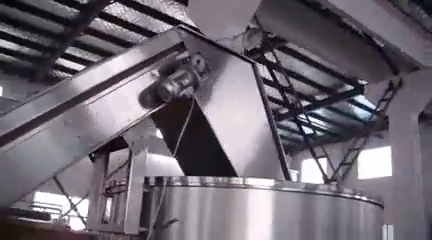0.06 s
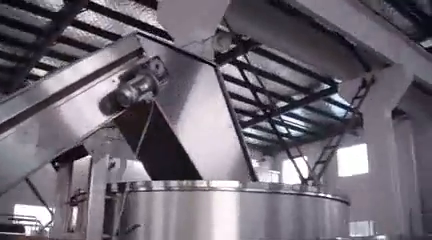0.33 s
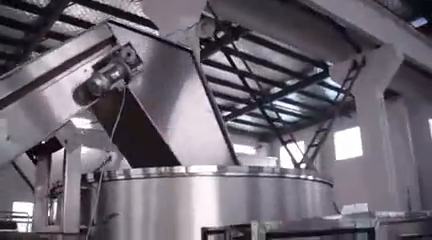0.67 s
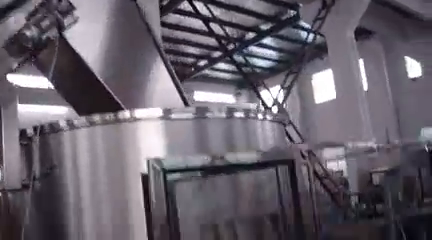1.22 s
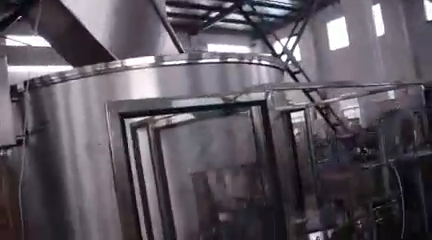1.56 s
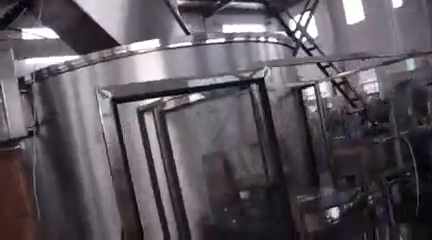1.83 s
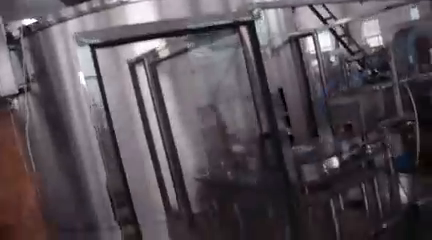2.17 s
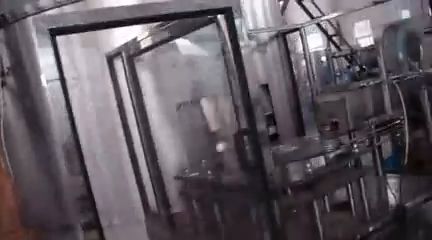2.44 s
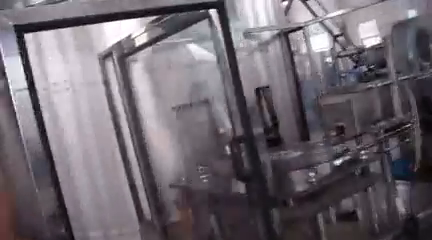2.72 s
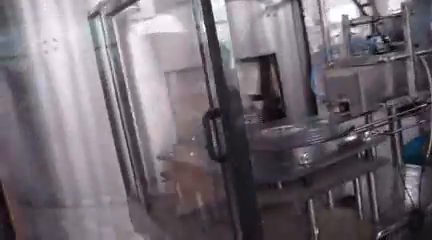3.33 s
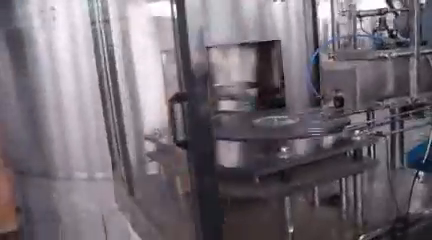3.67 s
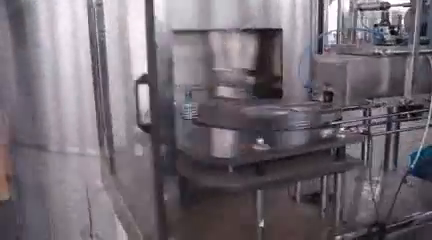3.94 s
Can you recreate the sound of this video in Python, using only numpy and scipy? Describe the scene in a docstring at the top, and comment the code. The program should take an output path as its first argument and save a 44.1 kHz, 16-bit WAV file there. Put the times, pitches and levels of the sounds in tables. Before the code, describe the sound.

A bottle sorting machine hisses, rumbles and puffs air rhythmically in a factory hall.

```python
"""Factory hall, stereo microphone carried along the steel drum of a bottle sorter, a little to one side.
From the start air jets hiss, the drive hums and the drum rumbles and knocks with tumbling plastic bottles.
From 0.3 s a bottle passes a jet about three times a second: a short puff, bright, then hollow.
Near 1.5 s one puff is missing and the hum swells as the microphone passes the drum.
After 2.6 s the gear whine fades and the rumble sinks, while the hiss and the puffs carry on."""
import sys
import numpy as np
from scipy import signal
from scipy.fft import rfft, irfft, next_fast_len
from scipy.io import wavfile
from scipy.ndimage import uniform_filter1d, map_coordinates

SR = 44100
rng = np.random.default_rng(int(sys.argv[2]) if len(sys.argv) > 2 else 0)


def transcribe(signal):
    """Save signal, clipped to [-1, 1], as a 16-bit WAV file at the path in sys.argv[1]."""
    frames = np.atleast_2d(signal).T
    limited = np.clip(frames, -1, 1)
    pcm = np.round(limited * 32767).astype(np.int16)
    wavfile.write(sys.argv[1], SR, pcm)


N = 176400

# bottles passing the jet: t/s, level/dB, pitch ratio, length ratio, bright edge/dB, hollow end/dB,
# the bottle's own ring f/Hz, its lift/dB
JET_PASSES = [(.266, -24, 0.9, 1.4, 4, -2, 3700, 0), (.576, -18, .96, .75, 0, -2, 6060, 6),
              (0.88, -21, .93, .9, -3.5, -2, 2550, 8), (1.179, -20.7, 1.05, 0.75, -4, -1, 4850, 5),
              (1.806, -20.3, 1.02, 1.06, 1, 0, 4100, 6), (2.113, -20, 1, .95, 0, 0, 4660, 5),
              (2.422, -19.5, 1.01, 0.93, 0, 0, 4210, 5), (2.727, -22, 1, 1.1, 2, 1.5, 3850, 4),
              (3.039, -19.8, 0.97, 1.04, -1, 1.5, 5470, 4), (3.346, -21, 0.98, 1.16, 1, 2, 2000, 3),
              (3.657, -20, 1.04, 1, 0.5, 0, 7700, 3), (3.964, -20.5, 1.01, 1.06, 2.5, 2, 3120, 5)]
# stages of a puff, before each pass scales them: f/Hz, width/octaves, delay/s, rise/s, fall/s, level/dB
STAGES = [(7180, 0.32, -0.015, 0.0053, 0.019, -5), (4320, 0.56, -0.00035, 0.011, 0.015, 1),
          (2170, 0.42, 0.009, 0.036, 0.024, -9.3)]
# resonances of the guard around the jet: f/Hz, lift/dB
GUARD_RINGS = [(3430, 2.5), (4150, 3.5), (4670, 4), (5470, 2), (6090, 1.5)]
# strong knocks in the drum: t/s, level/dB, f/Hz, hardness (added to the upper resonances)/dB, t60/s
STRONG_KNOCKS = [(.06, -23.5, 680, 8, 0.14), (.095, -23, 440, 4, .15), (.238, -23, 700, 3, .13),
                 (.43, -30, 490, -1, 0.15), (.777, -20.5, 446, 11, 0.11), (.805, -26, 1380, 7, .1),
                 (.968, -26, 1600, 12, .12), (1.042, -20.5, 444, -8, 0.1), (1.385, -27.5, 460, 6, 0.15),
                 (1.582, -27, 1890, 8, .14), (2.322, -26.5, 413, 3, 0.14), (2.595, -29, 520, 3, .12),
                 (2.704, -28, 980, -7, 0.1), (2.93, -24.5, 510, -6, 0.17), (3.195, -22.5, 475, -5, .17),
                 (3.574, -29.5, 870, 0, 0.15), (3.625, -27.5, 327, -8, 0.12)]
# a bottle's resonances: multiple of its pitch, level/dB before a tilt of -3 dB an octave
BOTTLE_MODES = [(1, 3), (2.03, 1), (4.0, -1.5)]
# low, middle and high drive tones: f/Hz, base level/dB, wavering/dB
DRIVE_TONES = [(149, -42, -0.5), (268.8, -44.5, 1.5), (915, -52.5, 3.5)]
# swell of the middle tone as the microphone passes the drum: t/s, gain/dB
PASSING_SWELL = [(0, -2), (1.05, .5), (1.35, 5), (1.8, 5.5), (2.0, 3.5), (2.25, 0), (4, -3)]
# levels along the walk: t/s, level/dB
HISS_WALK = [(0, -22.5), (.67, -23), (1.54, -23), (2.05, -24.5), (2.95, -25), (4, -25)]
RUMBLE_WALK = [(0, -24.5), (.28, -26), (.48, -22), (.72, -26.5), (1.4, -27), (2.1, -27.5), (2.6, -29),
               (3.0, -31), (3.6, -31), (4, -31.5)]
GEAR_WALK = [(0, -34), (.6, -32.5), (1.2, -34.5), (1.8, -35.5), (2.6, -35.5), (3.2, -43.5), (4, -55)]
DIN_WALK = [(0, -27.5), (.8, -30), (1.4, -30.5), (1.8, -32), (2.3, -31), (3.0, -33), (4, -34)]
DRONE_WALK = [(0, -38.5), (1.3, -37.5), (2.7, -38), (4, -43)]
# the drum's two wall resonances along the walk: t/s, lower level/dB, upper level/dB
WALL_WALK = [(0, -48, -50), (.55, -36, -44), (.9, -45, -44), (1.4, -46, -37), (2.0, -46, -37),
             (2.6, -45, -41), (3.0, -47, -50), (3.6, -38, -52), (4, -38, -52)]
# noise spectra: f/Hz, relative level/dB
HISS_SPECTRUM = [(500, -37.5), (1300, -11), (2300, -2), (3500, 0.5), (4800, 0.5), (6200, 2), (7400, 1),
                 (8600, -1), (9400, -4), (10200, -14)]
RUMBLE_SPECTRUM = [(40, -37), (90, -16), (130, -2.5), (200, 0.5), (245, -3), (320, -6), (400, -2.5),
                   (480, -3.5), (580, -15), (900, -36), (2000, -73)]
DIN_SPECTRUM = [(200, -25), (500, -3), (620, 0.5), (800, 0.5), (920, 2), (1030, 1), (1250, -1.5),
                (1800, -2), (2600, -11), (6000, -32)]
DRONE_SPECTRUM = [(20, -31), (35, -12.5), (54, -4), (75, -1), (105, -2), (170, -11), (400, -55)]
# how alike the hall sounds at the two microphone ports: f/Hz, likeness (1 is mono)
LIKENESS = [(1200, 1), (2800, 0.99), (5200, 0.73), (9500, 0.43)]
# left port behind right: f/Hz, lag/rad
LEFT_LAG = [(2200, 0), (3800, 0.53), (5500, 0.97), (8000, 1.34), (10000, 2.1)]
# left port above right: f/Hz, level/dB
LEFT_LIFT = [(2000, 0), (6000, 0), (8800, 1.4)]
# microphone response: f/Hz, gain/dB
MIC_RESPONSE = [(20, -1.5), (8500, 0.5), (9500, -2), (10100, -1.5), (10500, -20.5)]

TUMBLE_PER_S, TUMBLE_MAX_DB, TUMBLE_HZ, TUMBLE_T60_S = 12, -32.5, 462, 0.19
GEAR_HZ, SIDEBAND_HZ, SIDEBAND_DB = 390.4, 376, -4
KNOCK_RISE_S, HISS_PEAK_HZ, TOP_HZ = 0.0016, 7480, 10500


def puffs():
    """A bottle crossing the jet sounds three stages, high to low, coloured by its ring and the guard's."""
    t = np.arange(-SR // 5, SR // 5) / SR
    hz = np.fft.rfftfreq(len(t), 1 / SR)
    out = np.zeros((2, N + SR))
    for s, db, pitch, length, edge_db, hollow_db, own_hz, own_db in JET_PASSES:
        rings = GUARD_RINGS + [(own_hz, own_db)]
        lift_db = sum(lift * bell(hz, ring_hz, octaves=0.022) for ring_hz, lift in rings)
        colour = ripple(hz, depth_db=1.6, spacing_hz=138.7) * amp(lift_db)
        for stage, accent_db in zip(STAGES, (edge_db, 0, hollow_db)):
            centre_hz, octaves, delay, rise, fall, stage_db = stage
            noise = rfft(rng.standard_normal((2, len(t))))
            mid, side = unit(irfft(noise * colour * bell(hz, centre_hz * pitch, octaves), len(t)))
            angle = stereo_angle(centre_hz)
            air = np.cos(angle) * mid + np.sin(angle) * np.array([side, -side])
            slope_s = np.where(t < delay, rise, fall) * length
            swell = 1 / np.cosh(np.clip(np.sqrt(2) * (t - delay) / slope_s, -20, 20))
            out[:, round((s + t[0]) * SR):][:, :len(t)] += amp(db + stage_db + accent_db) * swell * air
    return out[:, :N]


def jets():
    """Compressed air hisses without pause, with a slight narrow lift near 7.5 kHz."""
    def colour(hz):
        peak_db = 0.5 * bell(hz, HISS_PEAK_HZ, octaves=.006)
        return amp(along(HISS_SPECTRUM, hz) + peak_db) * ripple(hz, depth_db=0.87, spacing_hz=69.9)
    return rush(colour, patchy_db=1.14) * amp(curve(HISS_WALK) + 0.24 * wobble(10))


def drum():
    """The turning drum rumbles, loudest early in the walk."""
    return rush(lambda hz: amp(along(RUMBLE_SPECTRUM, hz)), patchy_db=1.26) * amp(curve(RUMBLE_WALK))


def bottles():
    """Hollow plastic bottles knock in the drum: a few strong hits among many faint ones."""
    t = np.arange(SR // 4) / SR
    hz = np.fft.rfftfreq(len(t), 1 / SR)
    faint = [(when * N / SR, TUMBLE_MAX_DB - 6 * soft, TUMBLE_HZ * 2 ** (high - .5), 0, TUMBLE_T60_S)
             for when, soft, high in rng.random((int(TUMBLE_PER_S * N / SR), 3))]
    out = np.zeros(N + SR)
    for s, db, pitch_hz, hard_db, t60 in STRONG_KNOCKS + faint:
        body = sum(amp(mode_db + hard_db * (k > 1)) * bell(hz, k * pitch_hz, octaves=0.14) / np.sqrt(k)
                   for k, mode_db in BOTTLE_MODES)
        ring = unit(irfft(rfft(rng.standard_normal(len(t))) * body, len(t)))
        decay = amp(-60 * t / t60) * (1 - np.exp(-t / KNOCK_RISE_S))
        out[round(s * SR):][:len(t)] += amp(db) * unit(ring * decay) * np.sqrt(np.mean(decay ** 2))
    return out[:N]


def walls():
    """The drum's steel walls boom at two pitches, shaken by the tumbling load."""
    s, lower_db, upper_db = np.transpose(WALL_WALK)
    def boom(centre_hz, db):
        band = rush(lambda hz: bell(hz, centre_hz, octaves=.1), patchy_db=1)
        return band * amp(curve(np.transpose([s, db])))
    return boom(centre_hz=178, db=lower_db) + boom(centre_hz=278, db=upper_db)


def motor():
    """The motor hums in three tones; the middle one flutters under the tumbling load."""
    low, middle, high = [amp(db + waver_db * wobble(7.8)) * tone(hz, wander_hz=0.00897 * hz, rate=12)
                         for hz, db, waver_db in DRIVE_TONES]
    flutter = 1 + .6 * wobble(30)
    return low + middle * flutter * amp(curve(PASSING_SWELL)) + high


def gears():
    """A rough gear whine beats against its sideband."""
    mesh = tone(GEAR_HZ, wander_hz=4, rate=25.08)
    sideband = amp(SIDEBAND_DB) * tone(SIDEBAND_HZ, wander_hz=4, rate=24.92)
    return unit(mesh + sideband) * amp(curve(GEAR_WALK) + 1.4 * wobble(16))


def hall():
    """Farther off: the din the drum raises in the hall, over the hall's own low drone."""
    din = rush(lambda hz: amp(along(DIN_SPECTRUM, hz)), patchy_db=0.97)
    drone = rush(lambda hz: amp(along(DRONE_SPECTRUM, hz)), patchy_db=1.5)
    return din * amp(curve(DIN_WALK) + 0.33 * wobble(12)) + drone * amp(curve(DRONE_WALK))


def amp(db):
    """Decibels to gain."""
    return 10 ** (np.asarray(db) / 20)


def unit(x):
    """Scale to rms 1."""
    return x / np.sqrt(np.mean(x ** 2) + 1e-20)


def along(points, hz):
    """Read (f/Hz, value) points on a log axis."""
    f, values = np.transpose(points)
    return np.interp(np.log(hz + 1), np.log(f + 1), values)


def curve(rows):
    """One value per sample from (t/s, value) rows."""
    return np.interp(np.arange(N) / SR, *np.transpose(rows))


def wobble(rate):
    """A smooth random curve, rate knots a second."""
    return map_coordinates(rng.standard_normal(1024), [np.arange(N) * rate / SR + 2], mode="mirror")


def filtered(x, response):
    """Filter x by a gain that depends on frequency."""
    size = next_fast_len(N + SR // 4)
    return irfft(rfft(x, size) * response(np.fft.rfftfreq(size, 1 / SR)), size)[..., :N]


def bell(hz, centre_hz, octaves):
    """Gain of one resonance."""
    return np.exp(-.5 * (np.log2((hz + 1) / centre_hz) / octaves) ** 2)


def ripple(hz, depth_db, spacing_hz):
    """Fine uneven colour from nearby steel panels."""
    return amp(depth_db * map_coordinates(rng.standard_normal(1024), [hz / spacing_hz], mode="mirror"))


def stereo_angle(hz):
    """Mid-to-side angle in radians: mono in the bass, wide in the treble."""
    return np.arccos(np.clip(along(LIKENESS, hz), -1, 1)) / 2


def rush(colour, patchy_db):
    """Coloured stereo noise of rms 1 with patches of random gain in time and frequency."""
    spectra = signal.stft(rng.standard_normal((2, N)), nperseg=512)[2]
    patches = uniform_filter1d(rng.standard_normal(spectra.shape[1:]), size=4, axis=0)
    patches = uniform_filter1d(patches, size=16, axis=1)
    pair = signal.istft(spectra * amp(patchy_db * unit(patches)), nperseg=512)[1][:, :N]
    width = lambda hz: np.array([np.cos(stereo_angle(hz)), np.sin(stereo_angle(hz)) * hz / (hz + 500)])
    mid, side = filtered(pair, lambda hz: colour(hz) * width(hz))
    return unit(np.array([mid + side, mid - side]))


def tone(hz, wander_hz, rate):
    """A sine of rms 1 whose pitch wanders."""
    return np.sqrt(2) * np.sin(2 * np.pi * np.cumsum(hz + wander_hz * wobble(rate)) / SR)


def scene():
    """The machine from slightly to one side: the treble differs between the two microphone ports."""
    sources = puffs() + jets() + drum() + bottles() + walls() + motor() + gears() + hall()
    sides = np.array([[.5], [-.5]])
    off_axis = lambda hz: amp(sides * along(LEFT_LIFT, hz)) * np.exp(-1j * sides * along(LEFT_LAG, hz))
    return filtered(sources, off_axis)


def record(dry):
    """The microphone is nearly flat, then rolls off into a steep band limit."""
    return filtered(dry, lambda hz: amp(along(MIC_RESPONSE, hz)) * (hz < TOP_HZ))


dry = scene()
out = record(dry)
transcribe(out)
```